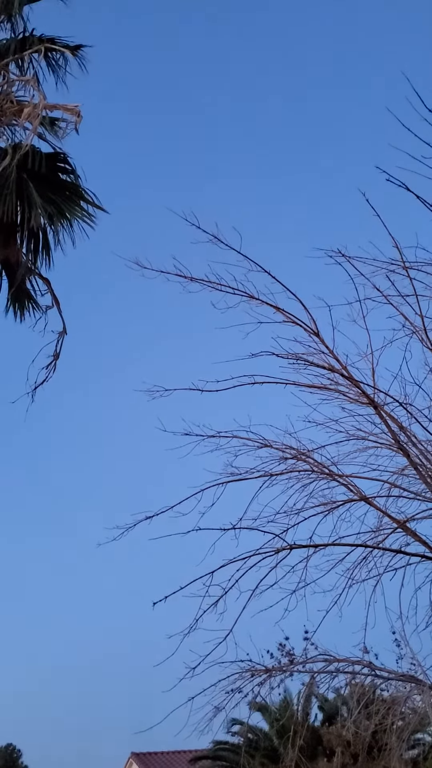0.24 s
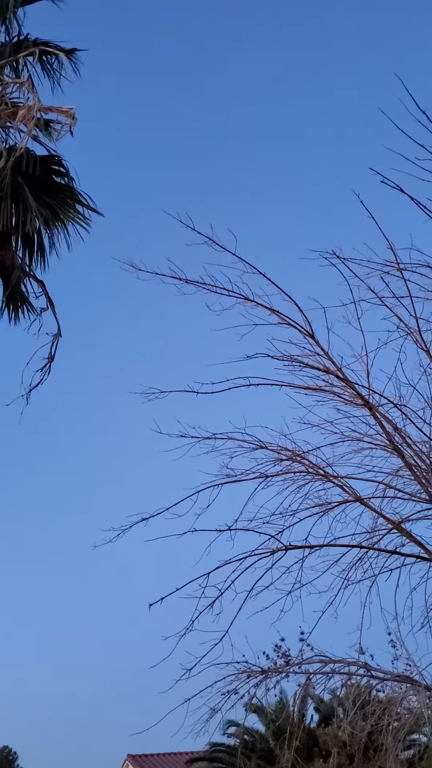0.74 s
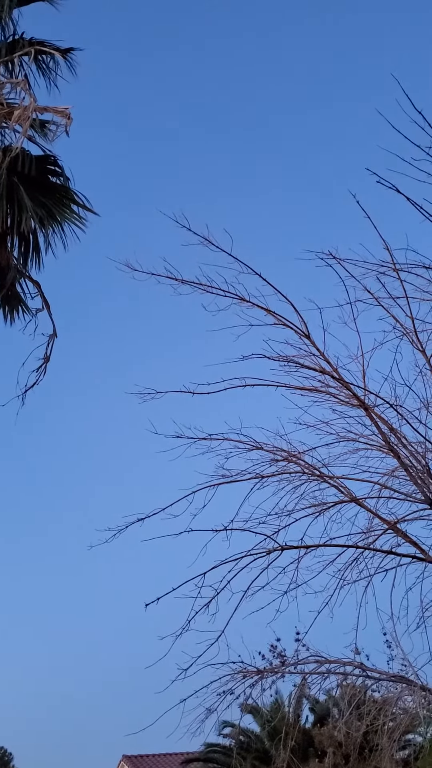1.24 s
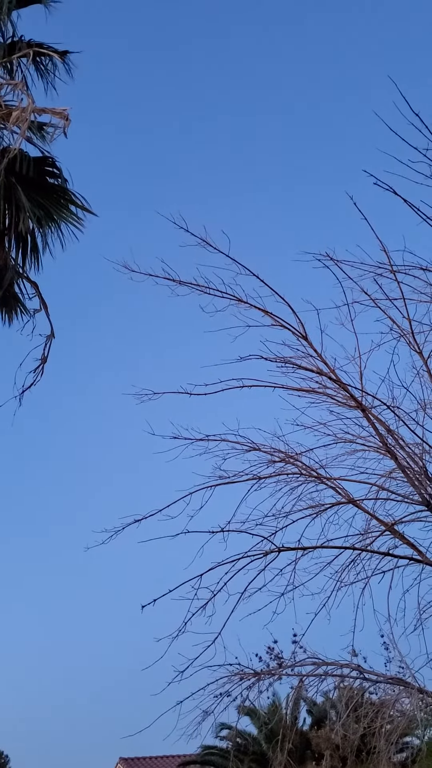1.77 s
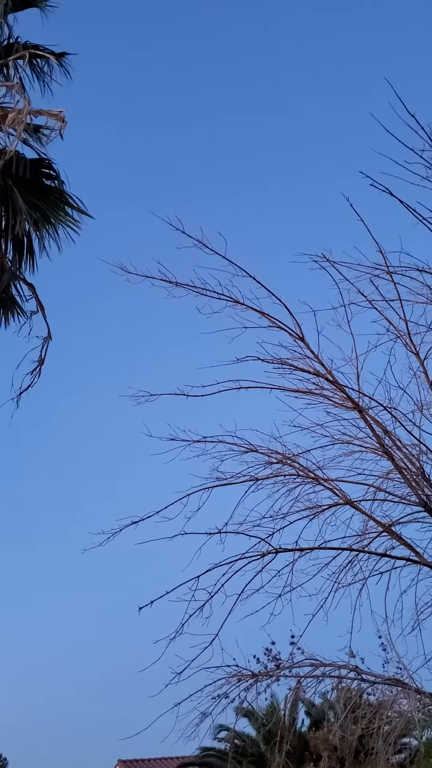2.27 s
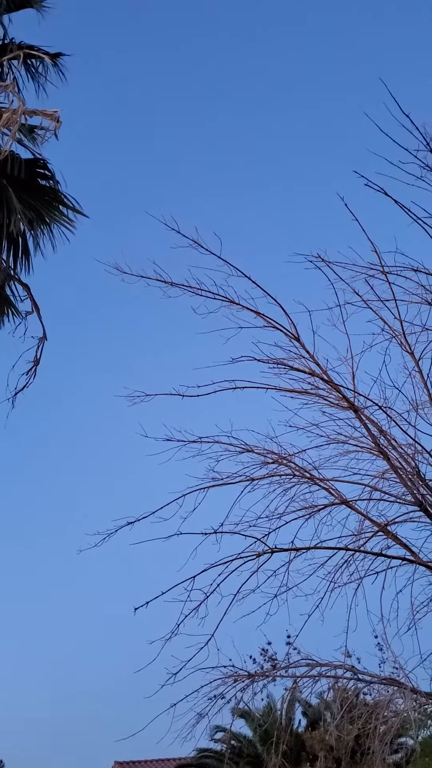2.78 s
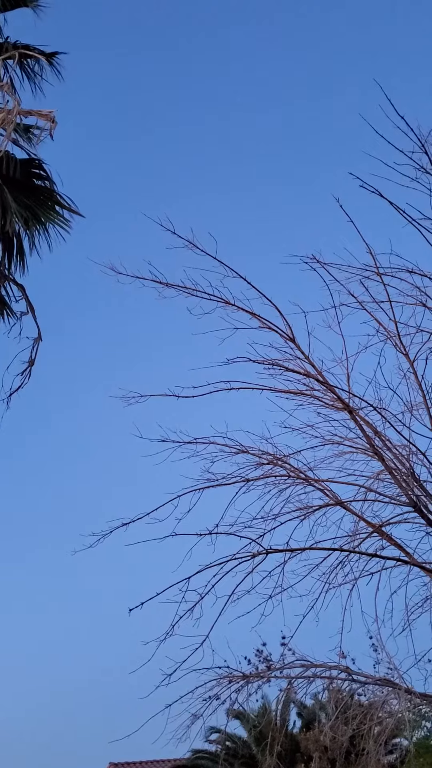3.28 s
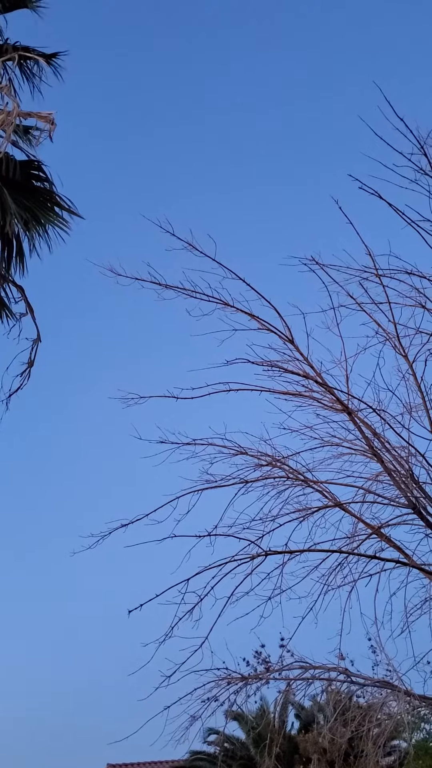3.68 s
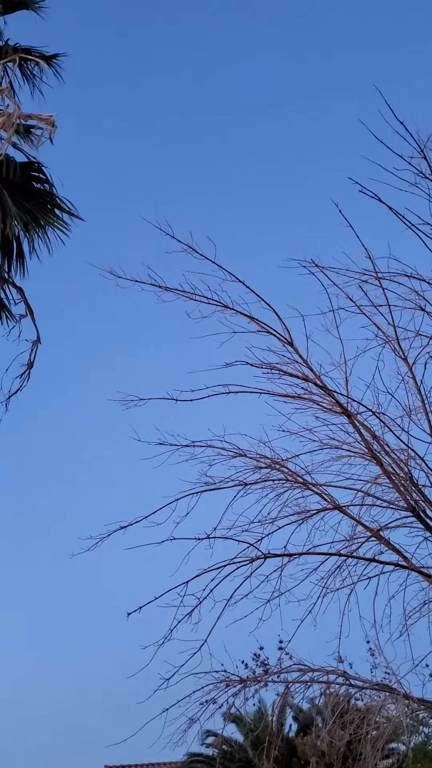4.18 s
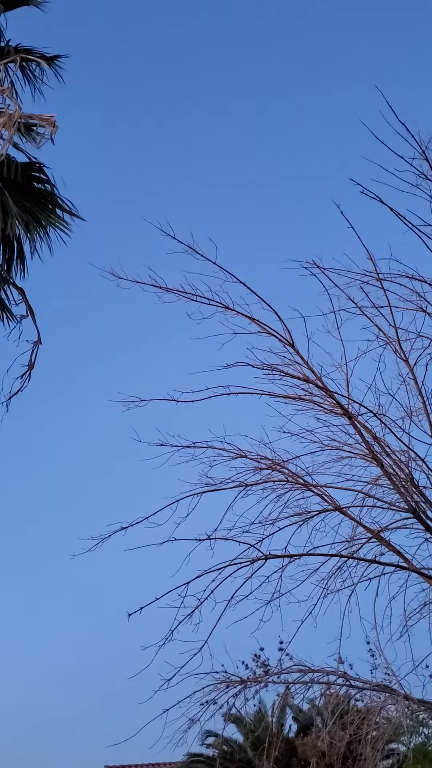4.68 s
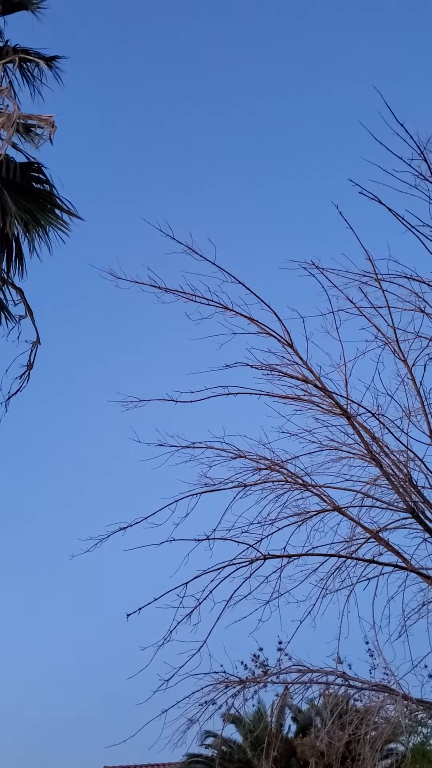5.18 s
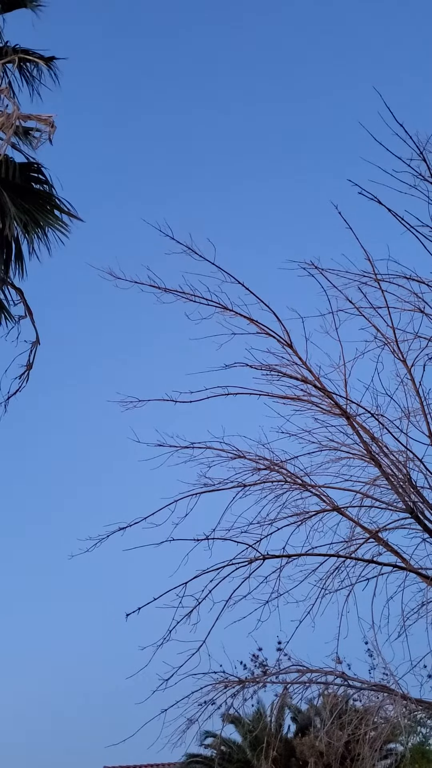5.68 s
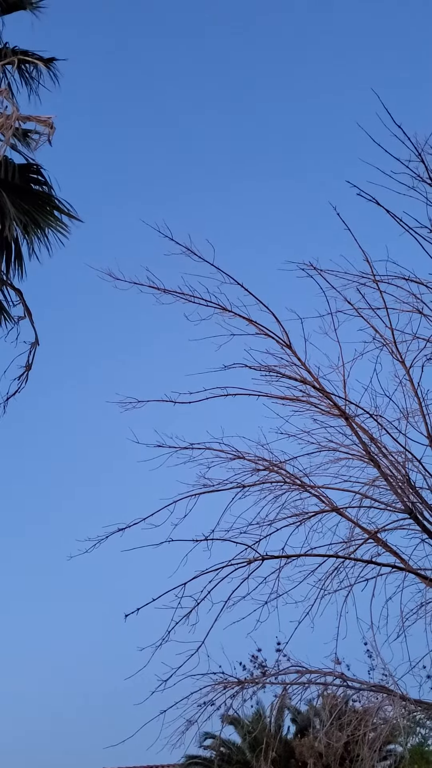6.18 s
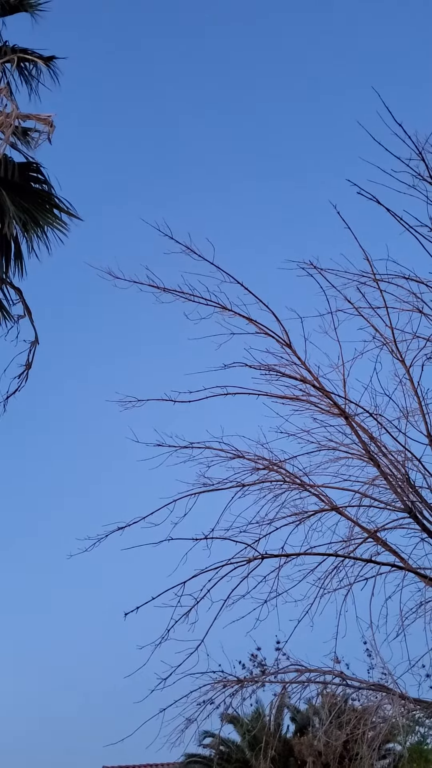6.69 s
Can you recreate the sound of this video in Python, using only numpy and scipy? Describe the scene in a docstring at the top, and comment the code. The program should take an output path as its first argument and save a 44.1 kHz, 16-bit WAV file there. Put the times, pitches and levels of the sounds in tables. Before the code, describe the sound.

A busy dawn chorus of small birds, sharp chirps, burry notes and quick whistles with light outdoor echoes, above soft distant traffic drone.

```python
"""Dawn sparrows around a yard

Sparrows chirp in the trees around a yard at dawn, some near and many farther off.
Each note is a fast pitch glide, pure or burry, with faint overtones and a little breath noise.
Walls and roofs answer with sparse echoes; the farthest birds blur into a band of noise.
Distant traffic, shaped noise plus wavering drones, rumbles below; two spaced microphones hear it all."""
import sys
import numpy as np
from scipy import signal
from scipy.fft import rfft, irfft
from scipy.io import wavfile
from scipy.ndimage import uniform_filter1d

SR = 44100
rng = np.random.default_rng(int(sys.argv[2]) if len(sys.argv) > 2 else 0)


def file_out(sig):
    """Save sig as 16-bit WAV at sys.argv[1]."""
    # one column per channel
    cols = np.atleast_2d(sig).T
    # limit, then scale
    lim = np.clip(cols, -1, 1)
    pcm = np.round(lim * 32767).astype(np.int16)
    wavfile.write(sys.argv[1], SR, pcm)


N = 305613  # length [samples]


def amp(db):
    """Gain of a level in dB."""
    return 10 ** (np.asarray(db) / 20)


def evened(x):
    """Scales a sound to rms 1."""
    return x / np.sqrt(np.mean(abs(x) ** 2) + 1e-20)


def read(points, hz):
    """Reads a table at hz, between its points on a log frequency axis."""
    f, value = np.transpose(points)
    return np.interp(np.log(hz + 1), np.log(f + 1), value)


def wander(chance, hz):
    """Smooths white noise twice into a curve of rms about 1 that changes up to about hz a second."""
    r = np.exp(-2 * np.pi * hz / SR)
    once = signal.lfilter([1 - r], [1, -r], chance)
    twice = signal.lfilter([1 - r], [1, -r], once)
    return twice / np.sqrt((1 - r) * (1 + r * r) / (1 + r) ** 3)


def add(mix, s, sound):
    """Mixes a sound in at s seconds."""
    part = mix[:, round(s * SR):][:, :sound.shape[1]]
    part += sound[:, :part.shape[1]]


# colour of the traffic wash: (frequency [Hz], relative level [dB per Hz])
TRAFFIC_COLOUR = [(15, -46), (28, -12), (45, -1.5), (59, -2), (88, -0.5), (112, -11), (171, -15),
                  (768, -22), (1240, -33.5), (1560, -44), (1700, -40.5), (2210, -84), (3740, -120)]
# likeness of the wash at the two microphones: (frequency [Hz], left-right correlation [-1 to 1])
TRAFFIC_LIKENESS = [(60, .98), (200, .87), (380, .35), (700, -.05), (1290, -.3), (2400, 0)]
TRAFFIC_DB = -46.5  # rms of the wash


def traffic_wash():
    """Noise shaped in frequency, its level swelling in patches, more alike left and right in the bass."""
    frames, hz = N // 512 + 5, np.fft.rfftfreq(2048, 1 / SR)
    a, b, c, d, patches = rng.standard_normal((frames, 1025, 5)).T
    patches = uniform_filter1d(uniform_filter1d(patches, 6, 0), 16, 1)
    swell_db = 0.59 * evened(patches)
    same = np.clip(read(TRAFFIC_LIKENESS, hz), -1, 1)[:, None]
    left = a + 1j * b
    right = same * left + np.sqrt(1 - same ** 2) * (c + 1j * d)
    spectrum = np.array([left, right]) * amp(read(TRAFFIC_COLOUR, hz)[:, None] + swell_db)
    wash = signal.istft(spectrum, nperseg=2048, noverlap=1536)[1][:, :N]
    return amp(TRAFFIC_DB) * evened(wash)


# engine drones: (pitch [Hz], wavering width [Hz], level at the start [dB], drift [dB per s])
ENGINE_DRONES = [(62.9, 8.2, -50.5, -0.2), (86.6, 6.15, -50, -0.3), (123.8, 7.31, -60, 0.44),
                 (247.3, 28, -60.5, -2.5)]


def engine_drones():
    """Low sines wavering in pitch and level, the same at both microphones."""
    out = np.zeros(N)
    t = np.arange(N) / SR
    for f, width_hz, db, db_per_s in ENGINE_DRONES:
        drift, swell = rng.standard_normal((2, N))
        waver_hz = width_hz / 2 * wander(drift, 1.405)
        turns = f * t + np.cumsum(waver_hz) / SR
        level_db = db + db_per_s * t + 2.5 * wander(swell, 11.0)
        out += amp(level_db) * np.sqrt(2) * np.sin(2 * np.pi * turns)
    return out


def blur():
    """The farthest birds melt into a soft, steady band of noise."""
    band = signal.butter(3, [3000., 7400.], "band", fs=SR, output="sos")
    return amp(-62) * signal.sosfilt(band, rng.standard_normal((2, N)))


ECHO_DB, ECHO_T60 = -6, 0.32  # send of the near birds [dB], decay by 60 dB at 2 kHz [s]


def yard(x):
    """Sparse echoes of random sign, other ones at each microphone, duller as they die."""
    taps = np.zeros((2, SR // 2))
    slots = np.arange(120, SR // 2 - 22, 22)  # one echo in every 22 samples
    at = slots + rng.integers(0, 22, (2, len(slots)))
    np.put_along_axis(taps, at, rng.choice([-1., 1.], at.shape), 1)
    hz, t, spectrum = signal.stft(taps, SR, nperseg=128)
    t60 = ECHO_T60 * (3500 / (hz[:, None] + 1500)) ** .5  # treble dies sooner
    tail = signal.istft(spectrum * amp(-60 * t / t60), SR, nperseg=128)[1]
    return signal.fftconvolve(x, tail / np.linalg.norm(tail[0]), axes=1)[:, :N]


# overtones of a pure note, stronger in burry ones: (multiple of the pitch, level [dB])
VOICE_OVERTONES = [(2, -35.5), (3, -47.5)]


def voice(hz, size, warble_hz):
    """A tone on the pitch curve hz that shakes in pitch and loudness the burrier it is, from a random perch."""
    z = rng.standard_normal((5, 8000))
    rates_hz = [180., 170., 640.]
    shake, flutter, rasp = (wander(z[k], f)[400:400 + len(hz)] for k, f in enumerate(rates_hz))
    turns = np.cumsum(hz + warble_hz * (hz / 3600.) ** 1.082 * shake) / SR
    burr = np.clip(warble_hz / 300, 0, 1)
    # fast tremor spreads a haze round the pitch
    tone = (1 + (0.022 + 0.28 * burr) * rasp) * np.sin(2 * np.pi * turns)
    for k, k_db in VOICE_OVERTONES:
        tone += amp(k_db + 6.5 * burr) * (1 + burr * rasp) * np.sin(2 * np.pi * k * turns)
    tone += amp(-54.0 + 5.5 * burr) * z[3, :len(hz)]  # air rushing past the membranes
    tone *= size * amp((0.96 + 0.5 * burr) * flutter)
    lag = int(np.clip(9.89 + 5.0 * z[4, 0], -20, 20))  # samples by which the left microphone hears it later
    pan_db = 0.62 * z[4, 1]
    pair = np.zeros((2, len(hz) + 40))
    pair[0, 20 + lag:][:len(hz)] = amp(pan_db / 2) * tone
    pair[1, 20:][:len(hz)] = amp(-pan_db / 2) * tone
    return pair


def note(ms, start_hz, end_hz, db, warble_hz):
    """A straight glide that swells and fades."""
    u = np.linspace(0, 1, int(abs(ms) * SR / 1000) + 2)
    swell = np.sin(np.pi * u ** 0.93) ** 0.75
    return voice(start_hz + (end_hz - start_hz) * u, amp(db) * swell, warble_hz)


def chirp(shape, stretch, factor, db):
    """One bird's own chirp along a bent pitch curve, its length and pitch scaled anew for each call."""
    ms, hz, shape_db = np.transpose(shape)
    t = np.arange(0, ms[-1], 1000 / SR / stretch)
    rounded_hz = uniform_filter1d(factor * np.interp(t, ms, hz), size=120)
    level = amp(db + np.interp(t, ms, shape_db))
    return voice(rounded_hz, level * signal.windows.tukey(len(t), .22), 137.0)


def flock(rows, birds=()):
    """All notes and chirps; a small throat gives out nothing low."""
    out = np.zeros((2, N))
    for s, *row in rows:
        add(out, max(s, 0), note(*row))
    for shape, calls in birds:
        for s, *row in calls:
            add(out, s, chirp(shape, *row))
    return signal.sosfilt(signal.butter(6, 2200., "high", fs=SR, output="sos"), out)


# The note functions below return (time [s], length [ms], start [Hz], end [Hz], level [dB],
# warble depth at 3600 Hz [Hz]).
FAR_COUNT, FAR_DB, FAR_SPREAD_DB = 300, -55, 2.2  # notes, their usual level and its spread [dB]


def far_notes():
    """Birds farther off chirp at random, mostly falling glides."""
    u, z = rng.random((FAR_COUNT, 4)).T, rng.standard_normal((FAR_COUNT, 2)).T
    hz = 3050 + 1900 * u[3] ** 2  # mid-glide pitch
    fall = np.clip(500 + 500 * z[0], -800, 1200)
    db = FAR_DB + FAR_SPREAD_DB * z[1] - 2.0 * u[3] ** 2  # the air dulls the high notes
    return np.transpose([u[0] * N / SR, 40 + 90 * u[1], hz + fall / 2, hz - fall / 2, db, 100 + 200 * u[2]])


# short peeps: (time [s], length [ms], start pitch [Hz], level [dB])
PEEP_NOTES = [(0.001, 34, 4580, -34), (0.043, 41, 4070, -33), (0.091, 18, 3840, -36),
              (0.313, 69, 3237, -28.5), (0.686, 50, 3900, -35), (0.749, 99, 4890, -44),
              (0.967, 27, 4500, -36), (1.013, 40, 3050, -35.5), (1.105, 18, 5050, -43),
              (1.195, 63, 3202, -31), (1.33, 35, 3540, -42), (1.53, 42, 3600, -34.5), (1.6, 30, 3576, -42),
              (1.774, 19.3, 3162, -23), (1.847, 42.4, 2988, -33.5), (1.855, 17, 5550, -42.5),
              (1.897, 74, 3263, -31.5), (1.966, 61, 4050, -28), (2.08, 8.3, 3700, -22.5),
              (2.19, 24, 3860, -42), (2.662, 32, 4790, -37), (2.707, 32, 3356, -19.5),
              (3.061, 50, 3865, -35), (3.36, 26, 2950, -32.5), (3.43, 75, 3080, -36),
              (3.366, 42, 5510, -41), (3.393, 51, 3013, -28.5), (3.427, 48, 3314, -31),
              (3.585, 26, 3434, -29), (3.693, 31, 4360, -37), (3.701, 16.7, 3750, -23),
              (3.725, 31, 3590, -26), (4.07, 30, 5850, -45.5), (4.112, 41, 4870, -36),
              (4.147, 61, 3290, -29), (4.393, 47, 3590, -29.5), (4.582, 45, 3180, -37),
              (4.74, 65, 4940, -40.5), (4.775, 34, 4100, -35), (4.817, 41, 3630, -36),
              (4.846, 31, 5600, -43), (4.89, 15, 3710, -26), (5.062, 32, 3600, -30), (5.073, 45, 2900, -33),
              (5.509, 31, 3620, -39), (5.675, 30, 6030, -38.5), (5.688, 37, 4530, -33),
              (5.758, 19, 3223, -24.5), (5.869, 43, 4550, -33), (6.305, 51, 6430, -48),
              (6.349, 27, 3570, -30.5), (6.518, 71, 3236, -30), (6.605, 20, 3750, -38),
              (6.628, 52, 3176, -39.5), (6.849, 21.6, 3210, -29)]
PEEP_HZ_PER_MS = 4.2
PEEP_WARBLE_HZ, PEEP_WARBLE_POWER = 68, 2.26  # depth setting for a 3600 Hz peep, growth with pitch


def peeps():
    """Short notes that barely sink, burrier the higher they start."""
    return [(s, ms, hz, hz - PEEP_HZ_PER_MS * ms, db, PEEP_WARBLE_HZ * (hz / 3600) ** PEEP_WARBLE_POWER)
            for s, ms, hz, db in PEEP_NOTES]


def short_warble(ms):
    """Warble depth [Hz] of a drop or rise: the longer, the burrier."""
    return 45. + 2.01 * ms


# rising slurs: (time [s], length [ms], start pitch [Hz], level [dB])
RISE_NOTES = [(0.146, 134, 5780, -46.5), (0.213, 34, 3330, -25.5), (0.241, 59, 4530, -38.5),
              (1.086, 100, 4070, -43), (1.158, 49, 3104, -33), (2.337, 21, 4244, -24),
              (2.338, 39, 3095, -30.5), (2.619, 44, 5370, -41.5), (2.993, 18, 4340, -22),
              (3.152, 115, 3060, -41.5), (3.205, 31, 4720, -41), (4.058, 16, 3094, -29.5),
              (4.169, 43, 3530, -33.5), (4.214, 12, 3173, -17.5), (4.262, 160, 4130, -42),
              (4.453, 9.5, 2910, -33), (4.803, 16, 3104, -22), (4.929, 170, 3620, -36.5),
              (5.431, 9.5, 3060, -38)]
RISE_HZ_PER_MS = 17.


def rises():
    """Slurs that all climb at one speed."""
    return [(s, ms, hz, hz + RISE_HZ_PER_MS * ms, db, short_warble(ms)) for s, ms, hz, db in RISE_NOTES]


# steep drops: (time [s], length [ms], start pitch [Hz], level [dB])
DROP_NOTES = [(0.307, 21, 4044, -30.5), (0.667, 50, 3990, -35.5), (0.97, 49, 3990, -31),
              (1.135, 37, 4410, -31.5), (1.19, 30, 3900, -27), (1.215, 74, 5430, -38.5),
              (1.55, 27.5, 3800, -32.5), (1.89, 43, 4170, -32), (2.01, 49.5, 3950, -28),
              (2.603, 40.4, 4100, -30.5), (2.774, 85, 4947, -30), (2.905, 37, 4300, -36.5),
              (2.953, 29, 3500, -30.5), (2.989, 61, 4280, -31), (3.02, 11, 4420, -26),
              (3.045, 31, 3400, -36.5), (3.194, 9.9, 3476, -23.5), (3.253, 47, 4195, -27),
              (3.406, 27, 4030, -30.5), (3.493, 61, 4850, -35.5), (3.586, 30, 4580, -38),
              (3.57, 27, 5060, -27.5), (3.671, 33.5, 4350, -29.5), (3.773, 28, 4000, -32),
              (4.313, 110, 5304, -27.5), (4.341, 34, 4230, -30), (5.488, 27, 4270, -35),
              (5.053, 23, 4780, -25.5), (5.741, 10, 3300, -32), (5.862, 45, 5460, -41),
              (5.885, 45, 3915, -28.5), (5.919, 45, 3656, -39.5), (6.132, 24, 4390, -30.5),
              (6.165, 21, 3935, -30.5), (6.374, 51, 3803, -25), (6.458, 36, 6020, -38.5),
              (6.502, 13, 3910, -28.5), (6.573, 100, 5840, -39), (6.768, 22, 4000, -27),
              (6.797, 18.5, 3900, -27.5)]
DROP_HZ_PER_MS = 26.75


def drops():
    """Steep notes that all fall at one speed."""
    return [(s, ms, hz, hz - DROP_HZ_PER_MS * ms, db, short_warble(ms)) for s, ms, hz, db in DROP_NOTES]


# long burry chirps: (time [s], length [ms], start pitch [Hz], level [dB], second voice level [dB])
BURR_NOTES = [(0.132, 164, 4920, -37.5, -65), (0.208, 136, 4000, -29.5, -43),
              (1.129, 157, 4220, -35.5, -45), (1.674, 60, 6980, -48.5, -69), (1.72, 94, 3817, -28.5, -42.5),
              (1.839, 160, 5400, -43.5, -70), (1.931, 77, 4490, -36, -49), (2.021, 134, 4230, -34.5, -44.5),
              (2.295, 150, 4450, -33.5, -44.5), (2.542, 118, 4540, -36, -54), (2.654, 98, 3756, -31, -45),
              (2.754, 105, 5980, -41, -65), (2.94, 155, 4810, -35, -45.5), (3.509, 138, 4580, -30.5, -45),
              (3.653, 162, 4123, -33.5, -44), (4.105, 160, 3766, -30.5, -48), (4.85, 164, 3950, -33, -50),
              (5.088, 75, 4320, -34, -43.5), (5.715, 85, 3748, -27, -45), (5.65, 80, 6730, -47, -67),
              (5.814, 127, 6450, -46.5, -71), (6.094, 99, 4696, -37, -52.5), (6.469, 130, 3860, -38.5, -59),
              (6.738, 160, 4210, -37.5, -53)]
BURR_SAG, BURR_WARBLE_HZ = .76, 205.2  # end pitch over start pitch, warble depth [Hz]
UPPER_RATIO, UPPER_LEAD_S, UPPER_WARBLE_HZ = 1.384, 0.019, 332.7  # second voice


def burrs():
    """Long rough chirps that sag in pitch, each with a fainter second voice above that starts sooner."""
    rows = []
    for s, ms, hz, db, upper_db in BURR_NOTES:
        upper_hz = UPPER_RATIO * hz
        rows.append((s, ms, hz, BURR_SAG * hz, db, BURR_WARBLE_HZ))
        rows.append((s - UPPER_LEAD_S, ms, upper_hz, BURR_SAG * upper_hz, upper_db, UPPER_WARBLE_HZ))
    return rows


# pure whistles: (time [s], length [ms], start pitch [Hz], end pitch [Hz], level [dB])
WHISTLE_NOTES = [(3.845, 112, 4250, 4390, -40.5), (3.911, 25, 4340, 4330, -26),
                 (3.936, 46, 3757, 3640, -32.5), (4.032, 45, 2807, 3130, -27.5),
                 (4.085, 44, 2674, 2557, -27)]
WHISTLE_WARBLE_HZ = 15


def whistles():
    """Nearly steady whistles that step down in pitch."""
    return [(*row, WHISTLE_WARBLE_HZ) for row in WHISTLE_NOTES]


# a songbird's phrase, two long falls, low whistles and a burry climb:
# (time into it [ms], length [ms], start pitch [Hz], end pitch [Hz], level [dB], warble depth [Hz])
SONG_PHRASE = [(0, 160, 4730, 2520, -27.5, 102), (66.1, 51, 3740, 2300, -23.5, 21.7),
               (211.8, 62.8, 2860, 3150, -23.5, 115), (276, 46, 2220, 2620, -29, 46),
               (397, 160, 5200, 3400, -32.5, 317), (408.4, 136, 4400, 2575, -30.5, 210),
               (480, 30, 3700, 2680, -20, 33), (529, 28.3, 3260, 2860, -22, 51),
               (653, 81.3, 2950, 3150, -31.5, 167), (660, 68, 3300, 3900, -35, 292),
               (670, 130, 3900, 5300, -35.5, 282), (730, 150, 3700, 8100, -43.5, 190)]
# its two deliveries: (time [s], stretch [factor], level shift [dB])
SONG_DELIVERIES = [(0.033, 1.0, -1.5), (4.221, 1.025, -3.5)]


def song():
    """The phrase sung twice, its timing stretched and its level shifted each time."""
    return [(s + stretch * at / 1000, stretch * ms, hz, end, db + call_db, warble)
            for s, stretch, call_db in SONG_DELIVERIES
            for at, ms, hz, end, db, warble in SONG_PHRASE]


# chirp shapes: (time into it [ms], pitch [Hz], relative level [dB])
# their calls: (time [s], stretch [factor], pitch [factor], level [dB])
# a chirp with two pitch peaks
TWIN_PEAK_SHAPE = [(0, 3000, 2), (22, 5800, -13), (44, 3500, 2), (56.8, 3200, -1.5), (71.4, 3900, -1),
                   (78.3, 3400, 7), (97, 2300, -18.5)]
TWIN_PEAK_TIMES = [(0.910, 1.0, 1.0, -33), (1.475, 1.0, .985, -35), (2.546, 1.0, 1.01, -33),
                   (3.117, 1.02, .975, -35), (5.456, 1.0, .985, -36), (6.107, 1.0, 1.01, -34),
                   (6.734, .97, .99, -33)]
# a chirp that zigzags in pitch and ends lower
ZIGZAG_SHAPE = [(0, 3000, 7.5), (19.2, 5500, -17.5), (33.97, 3500, 1), (44.65, 4600, -2), (57.62, 2850, -9),
                (69.44, 3300, 4.5), (91.9, 2700, 0)]
ZIGZAG_TIMES = [(1.877, .86, .99, -34), (2.894, .95, 1.0, -31), (5.368, .98, .99, -31)]
# a chirp that holds high, then slides down
SLIDE_SHAPE = [(0, 4100, -4), (14.84, 3800, -2), (35.6, 4000, -0.5), (44.48, 4000, -17.5), (74, 3100, 3),
               (110.1, 2300, -8.5)]
SLIDE_TIMES = [(0.202, 0.79, 1.09, -26.5), (0.957, 0.83, 1.078, -28), (1.71, 0.77, 1.08, -27.5),
               (2.328, 0.85, 0.99, -28.5), (2.988, 0.87, 0.98, -28.5), (3.657, 0.76, 1.074, -28),
               (4.329, 0.92, 0.974, -30.5), (5.041, 0.86, 0.95, -27.5), (5.685, 0.83, 1.09, -27),
               (6.331, 0.61, 1.22, -30.5)]


def repeating_birds():
    """Three near birds, each repeating a chirp of its own."""
    return [(TWIN_PEAK_SHAPE, TWIN_PEAK_TIMES), (ZIGZAG_SHAPE, ZIGZAG_TIMES), (SLIDE_SHAPE, SLIDE_TIMES)]


def scene():
    """Near birds direct and echoed, far birds only as echoes, over blur and traffic."""
    near_notes = song() + whistles() + burrs() + drops() + rises() + peeps()
    near = flock(near_notes, repeating_birds())
    echoes = yard(amp(ECHO_DB) * near + flock(far_notes()))
    return near + echoes + blur() + traffic_wash() + engine_drones()


# colour of both microphones: (frequency [Hz], gain [dB])
MICROPHONE_COLOUR = [(30, -10), (45, -5), (6500, 1), (9000, -5), (11500, 8.5), (15500, 17.5)]
# left-right balance of the microphones by frequency: (frequency [Hz], left minus right [dB])
MICROPHONE_BALANCE = [(400, 0), (750, -2.5), (2800, 2), (3700, -6), (9000, -3)]
HISS_DB, EDGE_HZ = -84.5, 15760  # self-noise before the colour, upper band limit


def record(dry):
    """Self-noise joins, then the colour and left-right balance of the microphones, and the band limit."""
    hz = np.fft.rfftfreq(N, 1 / SR)
    colour_db = read(MICROPHONE_COLOUR, hz) + np.outer([.5, -.5], read(MICROPHONE_BALANCE, hz))
    noisy = dry + amp(HISS_DB) * rng.standard_normal(dry.shape)
    coloured = irfft(rfft(noisy) * amp(colour_db), N)
    low_pass = signal.firwin(1023, EDGE_HZ, window=("kaiser", 9), fs=SR)
    return signal.oaconvolve(coloured, low_pass[None], "same")


dry = scene()
out = record(dry)
file_out(out)
```